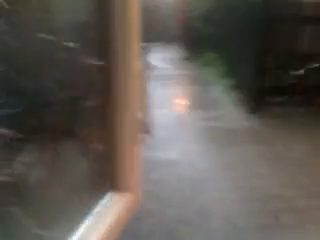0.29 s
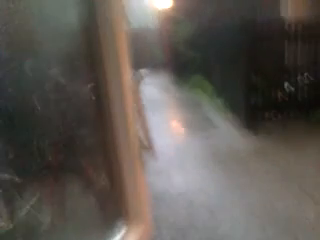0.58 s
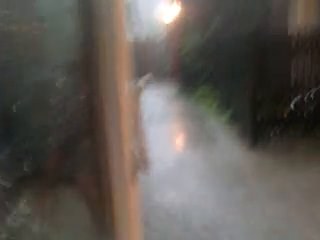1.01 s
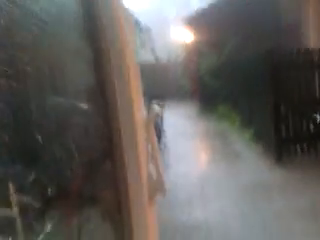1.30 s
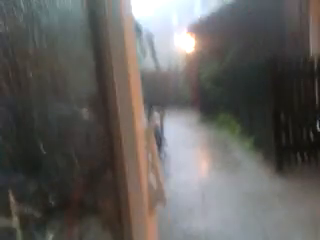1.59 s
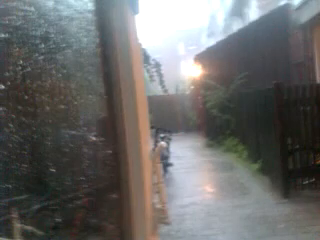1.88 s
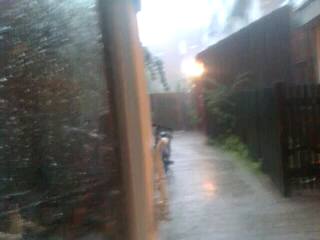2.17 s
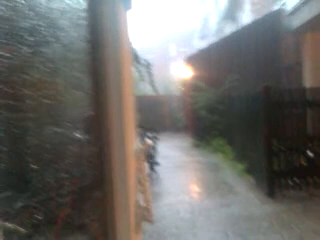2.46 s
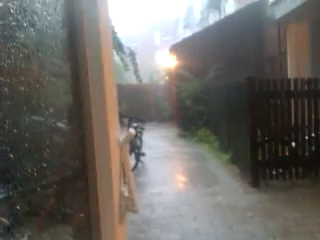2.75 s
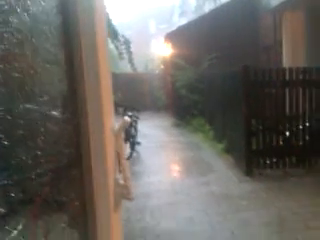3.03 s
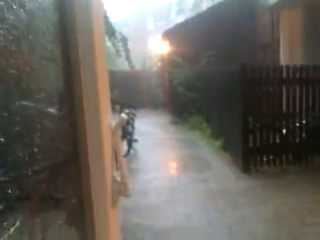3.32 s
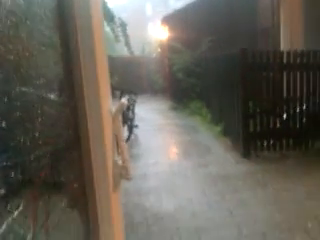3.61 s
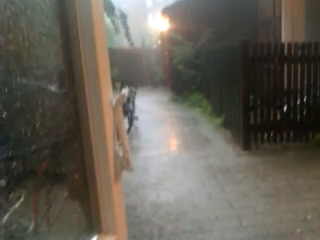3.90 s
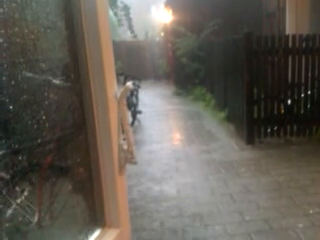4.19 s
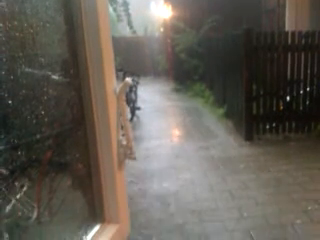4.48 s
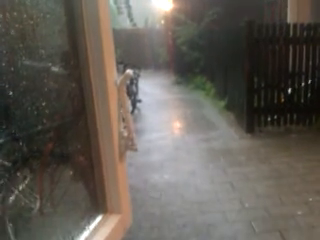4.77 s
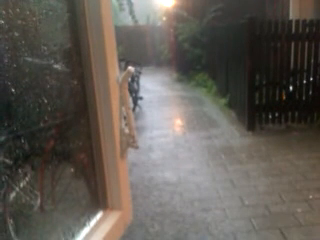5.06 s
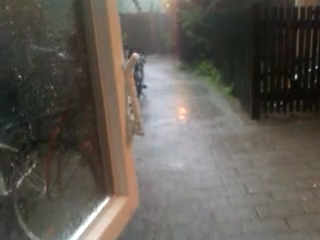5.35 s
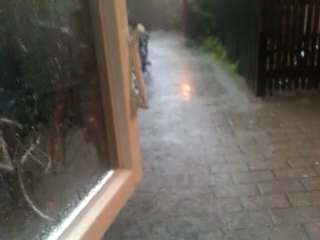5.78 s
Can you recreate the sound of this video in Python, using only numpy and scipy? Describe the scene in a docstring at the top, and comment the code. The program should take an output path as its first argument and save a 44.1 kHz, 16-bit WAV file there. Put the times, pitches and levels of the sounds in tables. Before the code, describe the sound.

Heavy rain spatters on paving in a dense wash, while fat drips hit puddles and a deep drumming rumble rises twice underneath.

```python
"""A hiss of torrential rain on a paved yard, from an open doorway, on one narrow-band microphone.
Far off, countless drops merge into a wash; nearer ones spatter on the paving, and fat drips
smack into puddles and leave ringing bubbles. Underneath, a low, thumping rumble, probably the
downpour drumming on the roof, swells twice with the gusts. One faint, dry tick sounds early on."""
import sys
import numpy as np
from scipy import signal
from scipy.fft import rfft, irfft, next_fast_len
from scipy.io import wavfile
from scipy.ndimage import uniform_filter1d

SR = 44100
rng = np.random.default_rng(int(sys.argv[2]) if len(sys.argv) > 2 else 0)


def wav_out(sig):
    """Save sig, one row per channel (or a flat mono array), as 16-bit PCM at SR to the path in sys.argv[1]."""
    wavfile.write(sys.argv[1], SR, np.round(np.clip(np.atleast_2d(sig).T, -1, 1) * 32767).astype(np.int16))


N = 262836

# How hard the rain falls on the yard: t/s, level/dB
RAINFALL = [(0.0, -29), (0.25, -30.5), (0.6, -26.5), (1.0, -27), (1.35, -28), (3.05, -26.5), (4.1, -29),
            (4.95, -30), (5.3, -29), (5.96, -29)]
# How hard gusts drive it onto the roof: t/s, level/dB
GUST_LEVEL = [(0.0, -33.5), (0.65, -36), (0.95, -28.5), (1.4, -36), (2.3, -33.5), (3.0, -36.5),
              (3.7, -41.5), (4.3, -31.5), (4.7, -31.5), (5.6, -37), (5.96, -34)]
# Spectra of the far wash, the near splashes and the thuds overhead: f/Hz, level/dB
WASH_SPECTRUM = [(20, -25), (60, -9), (100, -3), (200, -2), (400, -0.5), (550, -1.5), (750, -0.9),
                 (1000, -1.5), (1300, -3.5), (1800, -2.5), (3000, -7.5), (4500, -14.5), (6000, -58.5)]
SPLASH_SPECTRUM = [(300, -30), (1200, -15), (1650, -9), (2000, -0.5), (2650, 1.5), (3100, -2), (3500, -1.5),
                   (4700, -5.5), (6000, -58)]
THUD_SPECTRUM = [(20, -24.5), (45, -23), (70, -11), (100, -6), (140, 0), (210, 1), (270, -5), (340, -11.5),
                 (600, -30), (1500, -53.5)]
# Roof resonances: f/Hz, bandwidth/Hz, level/dB
ROOF_MODES = [(99, 14, -9), (134.4, 18, -1.5), (197, 14, -5), (211, 14, -4), (247, 34, -8)]
# Heavy blows within the rumble: t/s, level/dB, f/Hz, t60/s
HEAVY_BLOWS = [(0.049, -24, 120, 0.3), (0.176, -19.5, 140.4, 0.11), (.495, -20.5, 205, 0.12),
               (0.559, -19, 227, 0.1), (0.801, -15.5, 193, 0.14), (.815, -23, 357, 0.14),
               (0.837, -20, 205, 0.13), (0.873, -22, 338, 0.14), (0.929, -17, 198, 0.11),
               (.965, -25, 99, 0.21), (1.001, -22, 117, .2), (1.086, -27, 95, 0.11),
               (1.662, -17.5, 240, 0.11), (1.853, -21, 215, 0.11), (2.196, -23.5, 129.5, .15),
               (2.311, -19, 140.4, 0.18), (2.4, -24.5, 244, 0.12), (2.57, -23.5, 164, .12),
               (3.074, -21, 164, 0.13), (3.34, -22, 241, .1), (3.42, -23.5, 200, 0.087),
               (3.905, -23.5, 198, 0.28), (4.264, -20, 208.5, 0.14), (4.532, -24, 109, 0.089),
               (4.594, -16, 195.5, .17), (4.636, -20.5, 129, 0.18), (4.765, -21.5, 137, .3),
               (5.05, -26.5, 207, 0.088), (5.123, -18.5, 211, 0.14), (5.497, -21, 181, .11),
               (5.87, -21.5, 185, 0.16)]
# Fat drips: t/s, level/dB, f/Hz, t60/s, bubble level/dB (low for a splat, high for a plink)
PUDDLE_DRIPS = [(0.181, -8.5, 2750, 0.024, -7), (.398, -13.5, 2390, 0.045, -5),
                (0.587, -14, 2670, 0.045, -12.5), (.782, -10, 3400, .04, -15),
                (.862, -9, 2715, 0.079, -7.5), (0.947, -11, 2770, 0.033, -3),
                (0.96, -4.5, 2060, 0.0085, -6), (1.04, -14, 3280, 0.035, -11),
                (1.06, -12, 3240, 0.048, -14), (1.165, -17.5, 1700, 0.042, -8),
                (1.279, -14, 3530, 0.028, -10), (2.569, -13, 3427, 0.035, -5.5),
                (2.662, -15.5, 3060, 0.0338, -12), (2.68, -11, 3890, 0.013, -10),
                (2.808, -12, 1530, 0.019, 0.5), (2.856, -19, 2140, .03, -5), (2.923, -14, 3200, .02, -7),
                (3.072, 0.5, 3580, 0.0091, -1), (3.294, -15, 1475, 0.026, 0.5),
                (3.307, -13, 2610, 0.037, -8.5), (3.33, -15, 3470, 0.023, -8),
                (3.631, -16, 2130, 0.039, -9), (3.716, -20.5, 797, .06, -8),
                (4.274, -16.5, 2450, 0.054, -8), (4.312, -12.5, 3250, 0.028, -8),
                (4.653, -16.5, 2516, 0.052, -5), (5.421, -14, 1955, 0.081, -9),
                (5.525, -6, 2870, 0.037, -14.5), (5.69, -23, 1390, .05, -5.5)]
# The lone tick: t/s, level/dB
DRY_TICK = [(0.4736, -11.5)]
# Microphone response, falling steeply above 3.4 kHz: f/Hz, level/dB
MIC_RESPONSE = [(20, 1.5), (3400, 0.5), (3600, -3.5), (3800, -10.5), (4000, -16.5), (4300, -22),
                (4550, -37.5), (4780, -62.5), (5100, -88.5)]


def gain_of(db):
    """Decibels to gain."""
    return 10 ** (np.asarray(db) / 20)


def unit_rms(x):
    """Scales to rms 1."""
    return x / np.sqrt(np.mean(x ** 2) + 1e-20)


def level_curve(rows):
    """A level table's dB value at every sample."""
    return np.interp(np.arange(N) / SR, *np.transpose(rows))


def colour(x, spectrum):
    """Filters by a spectrum whose points are joined on a log-frequency axis."""
    size = next_fast_len(N + 8192)
    hz, db = np.transpose(spectrum)
    bin_hz = np.fft.rfftfreq(size, 1 / SR)
    bin_db = np.interp(np.log(bin_hz + 1), np.log(hz + 1), db)
    return irfft(rfft(x, size) * gain_of(bin_db), size)[:N]


def add(mix, start_s, sound):
    """Mixes a sound in at a time."""
    part = mix[round(start_s * SR):][:len(sound)]
    part += sound[:len(part)]


def band_noise(low_hz, high_hz, samples):
    """Band-passed noise of rms 1."""
    band = signal.butter(2, [low_hz, high_hz], "bandpass", fs=SR)
    return unit_rms(signal.lfilter(*band, rng.standard_normal(samples)))


def impacts(per_s, spread_db):
    """Randomly timed blows: many small, a few large."""
    size = gain_of(spread_db * np.minimum(rng.exponential(1, N), 4))
    return size * rng.choice([-1, 1], N) * (rng.random(N) < per_s / SR)


def surges(low_hz, high_hz):
    """Rain arrives in uneven sheets: a random waver of rms 1."""
    t = np.arange(0, N / SR + .01, .005)
    rates = np.geomspace(low_hz, high_hz, num=24)
    waver = sum(np.sin(2 * np.pi * (hz * t + rng.random())) / np.sqrt(hz) for hz in rates)
    return np.interp(np.arange(N) / SR, t, unit_rms(waver))


def patchy_noise(patchy_db, flicker_db):
    """Noise with brief bright patches and a flicker shared by all pitches."""
    shape = (N // 128 + 5, 257)  # time frames, frequency bins
    spectra = rng.standard_normal(shape) + 1j * rng.standard_normal(shape)
    drift = uniform_filter1d(rng.standard_normal(shape), size=14, axis=0)
    patches = unit_rms(uniform_filter1d(drift, size=8, axis=1))
    flicker = unit_rms(uniform_filter1d(rng.standard_normal(shape[0]), size=12))
    spectra *= gain_of(patchy_db * patches + flicker_db * flicker[:, None])
    return signal.istft(spectra.T, nperseg=512, noverlap=384)[1][:N]


def yard_echoes(x, t60, wet_db):
    """Walls and fence throw a short scatter of echoes back to the doorway."""
    t = np.arange(SR // 3) / SR
    taps = rng.standard_normal(len(t)) * (rng.random(len(t)) < 2000 / SR)
    taps *= (t > .003) * gain_of(-60 * t / t60)
    return x + gain_of(wet_db) * signal.oaconvolve(x, taps / np.linalg.norm(taps))[:N]


def spatter(low_hz, high_hz, per_s, spread_db, cycles, wet_db=-7.5):
    """Drops land around the yard, each a ping of a few cycles at a pitch of its own."""
    sizes = impacts(per_s, spread_db)
    onsets = np.flatnonzero(sizes)[:, None]
    pitches = low_hz * (high_hz / low_hz) ** rng.random(N)[onsets]
    lag = np.arange(round(6 * cycles / low_hz * SR))
    turns = pitches * lag / SR
    envelopes = turns * np.exp(-turns / cycles)
    pings = sizes[onsets] * pitches * envelopes * np.sin(2 * np.pi * turns)
    drops = np.bincount((onsets + lag).ravel(), pings.ravel(), N)[:N]
    return unit_rms(yard_echoes(drops, t60=0.078, wet_db=wet_db))


def far_wash(base_db=-32, swell_share=0.25):
    """Far off, drops merge into the dull roar of the whole yard, with soft pats on leaves and wood."""
    pats = colour(spatter(395, 2043, per_s=800, spread_db=3.5, cycles=1.09), WASH_SPECTRUM)
    roar = colour(patchy_noise(patchy_db=1.5, flicker_db=1.1), WASH_SPECTRUM)
    wash = unit_rms(roar) + gain_of(-2) * unit_rms(pats)
    rain_db = level_curve(RAINFALL)
    swell_db = swell_share * (rain_db - rain_db.mean()) + 0.27 * surges(low_hz=3, high_hz=13)
    return gain_of(base_db + swell_db) * unit_rms(wash)


def near_splashes(trim_db=0.72, surge_db=0.62):
    """Near the door, drops burst on wet paving: bright hiss, brief bubbles and crisp, close ticks."""
    drops = spatter(1360, 4530, per_s=1600, spread_db=3.5, cycles=1.12)
    bubbles = spatter(1700, 4200, per_s=170, spread_db=2.0, cycles=4.4)
    close_ticks = spatter(3200, 4800, per_s=40, spread_db=2.5, cycles=1.3, wet_db=-12)
    hiss = colour(patchy_noise(patchy_db=2.33, flicker_db=1.0), SPLASH_SPECTRUM)
    grains = colour(drops + gain_of(-3) * bubbles + gain_of(-8) * close_ticks, SPLASH_SPECTRUM)
    splash_db = trim_db + level_curve(RAINFALL) + surge_db * surges(low_hz=6, high_hz=14)
    return gain_of(splash_db) * unit_rms(unit_rms(hiss) + gain_of(-0.4) * unit_rms(grains))


def roof_rumble(boom_db=-3.5, surge_db=1.5, thuds_db=-36, gust_share=0.82):
    """Overhead, sheets of water thud on the roof and ring its low resonances, harder in a gust."""
    t = np.arange(SR // 3) / SR
    ring = sum(gain_of(db) * width * np.exp(-np.pi * width * t) * np.sin(2 * np.pi * hz * t)
               for hz, width, db in ROOF_MODES)
    blows = impacts(per_s=400, spread_db=4.5)
    boom = unit_rms(signal.oaconvolve(blows, np.gradient(ring))[:N])
    thuds = unit_rms(colour(impacts(per_s=400, spread_db=2), THUD_SPECTRUM))
    gust_db = level_curve(GUST_LEVEL) + surge_db * surges(low_hz=6, high_hz=18)
    thud_swell_db = gust_share * (gust_db - gust_db.mean())
    return gain_of(thuds_db + thud_swell_db) * thuds + gain_of(gust_db + boom_db) * boom


def thumps(rise_s=.007, roughness=0.25):
    """Heavier blows in the rumble: each a low, uneven boom that swells quickly and dies."""
    out, t = np.zeros(N), np.arange(SR // 3) / SR
    for start_s, db, hz, t60 in HEAVY_BLOWS:
        shudder = band_noise(hz * .7, hz * 1.56, len(t))
        tone = np.sin(2 * np.pi * (hz * t + rng.random()))
        envelope = (1 - np.exp(-t / rise_s)) * gain_of(-60 * t / t60)
        add(out, start_s, gain_of(db) * envelope * (tone + roughness * shudder))
    return out


def drips(glide=0.04, smack_db=-7.5, rise_s=0.00093):
    """Out in the puddles, each fat drip smacks the water and leaves a bubble that rises in pitch."""
    out, t = np.zeros(N), np.arange(SR // 8) / SR
    for start_s, db, hz, t60, bubble_db in PUDDLE_DRIPS:
        bubble_hz = hz * (1 + glide * np.minimum(t / t60, 1))
        bubble = gain_of(bubble_db) * np.sin(2 * np.pi * np.cumsum(bubble_hz) / SR)
        smack = gain_of(smack_db) * band_noise(hz * 0.8, hz * 1.22, len(t))
        envelope = (1 - np.exp(-t / rise_s)) * gain_of(-60 * t / t60)
        add(out, start_s, gain_of(db) * envelope * (bubble + smack))
    return yard_echoes(out, t60=0.2, wet_db=-8)


def tick(decay_s=0.00018):
    """A tiny, full-range tick in the signal, with none of the yard's echo."""
    out, t = np.zeros(N), np.arange(SR // 100) / SR
    for start_s, db in DRY_TICK:
        add(out, start_s, gain_of(db) * np.exp(-t / decay_s))
    return out


def scene():
    """All the rain as it reaches the doorway, in mono."""
    return (far_wash() + near_splashes() + roof_rumble() + thumps() + drips())[None]


def record(dry):
    """The microphone loses the treble; the tick joins after it, and a low-pass limits both."""
    heard = colour(dry[0], MIC_RESPONSE) + tick()
    low_pass = signal.firwin(511, cutoff=15800, window=("kaiser", 9), fs=SR)
    return signal.oaconvolve(heard, low_pass, "same")[None]


dry = scene()
out = record(dry)
wav_out(out)
```